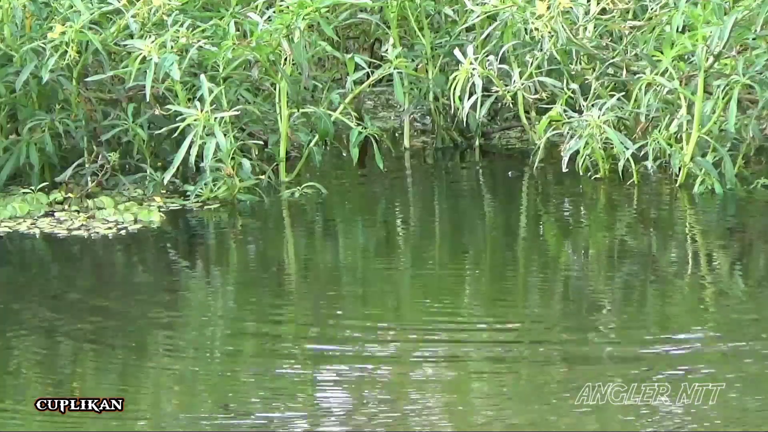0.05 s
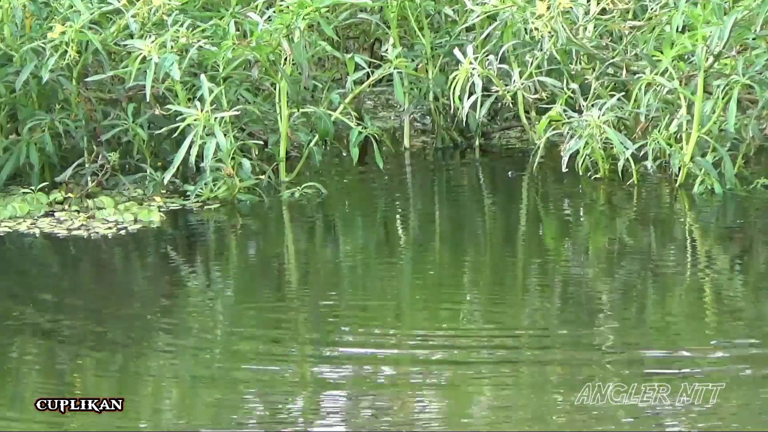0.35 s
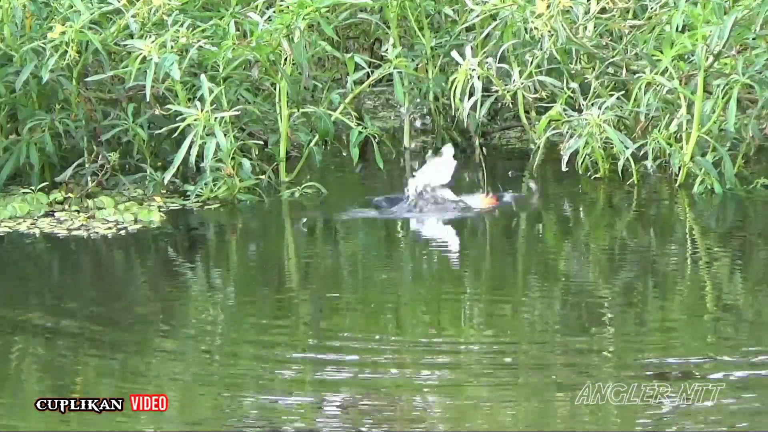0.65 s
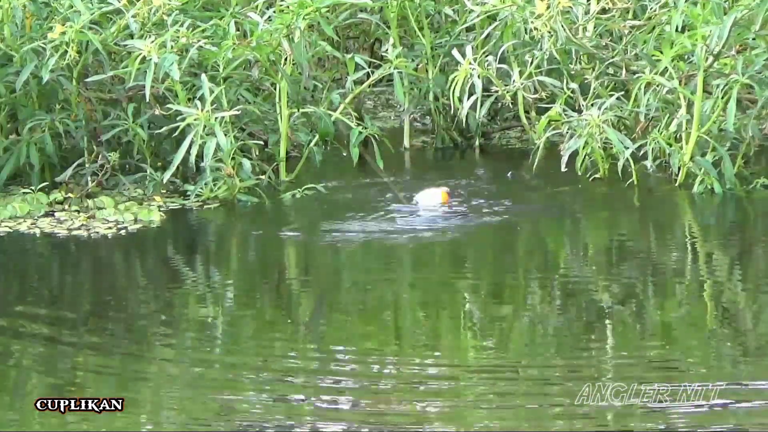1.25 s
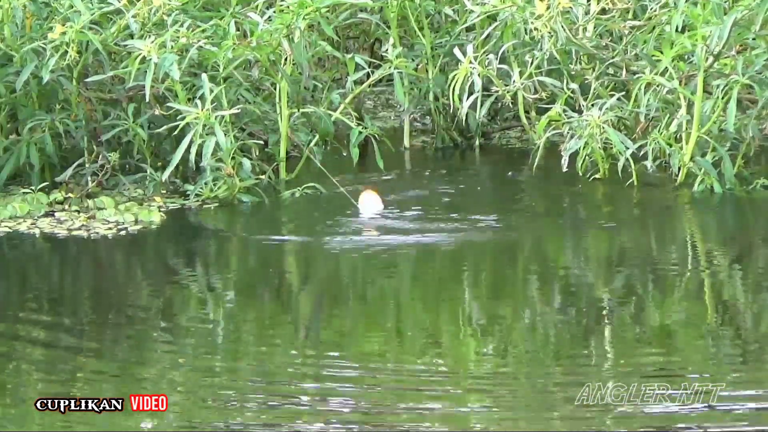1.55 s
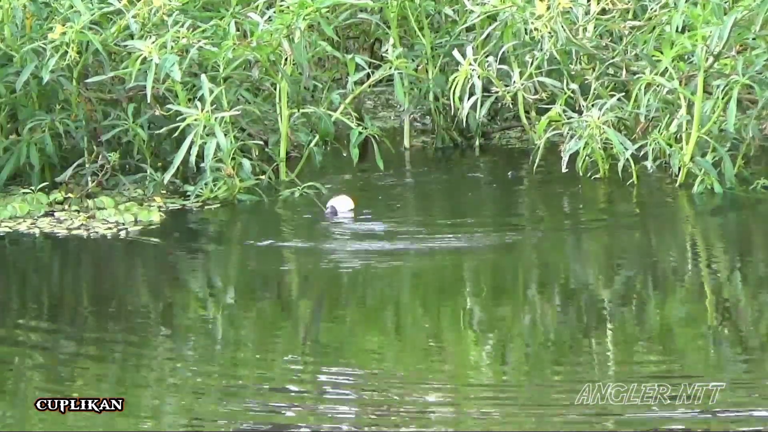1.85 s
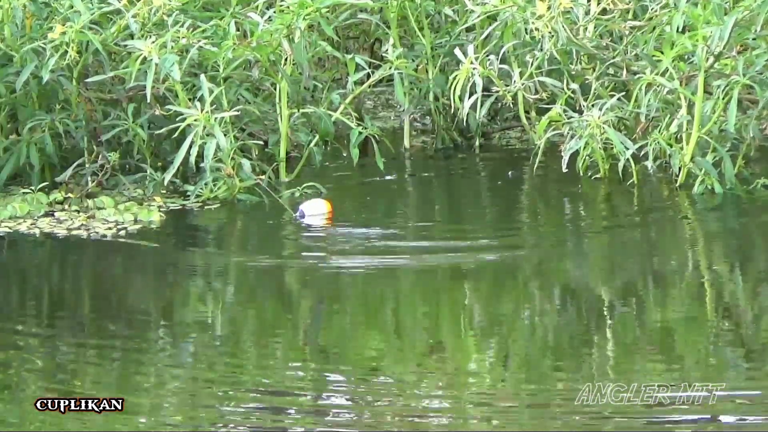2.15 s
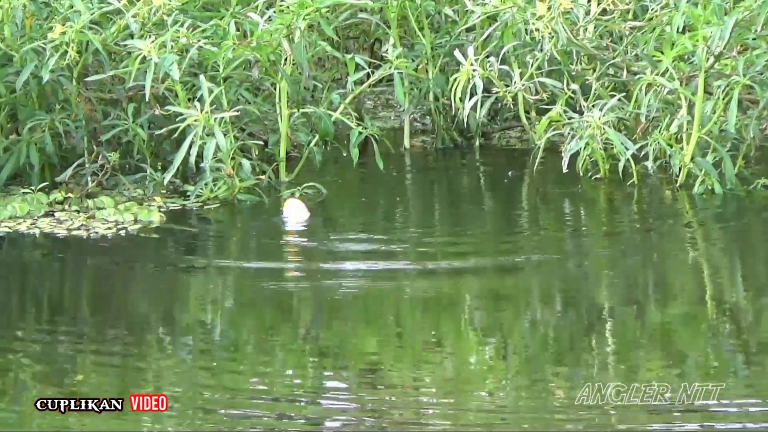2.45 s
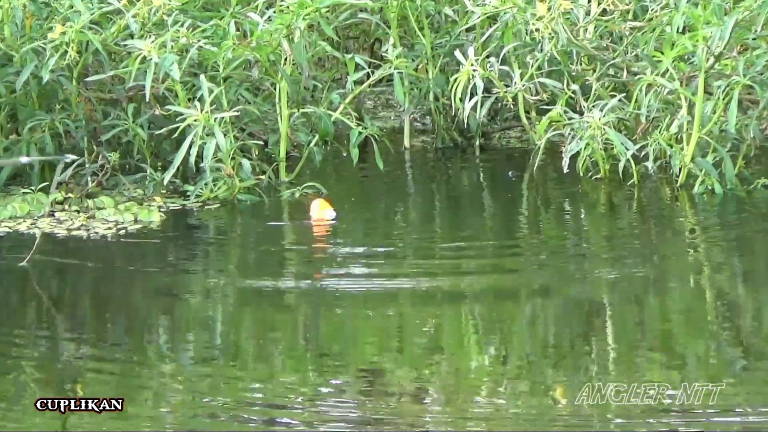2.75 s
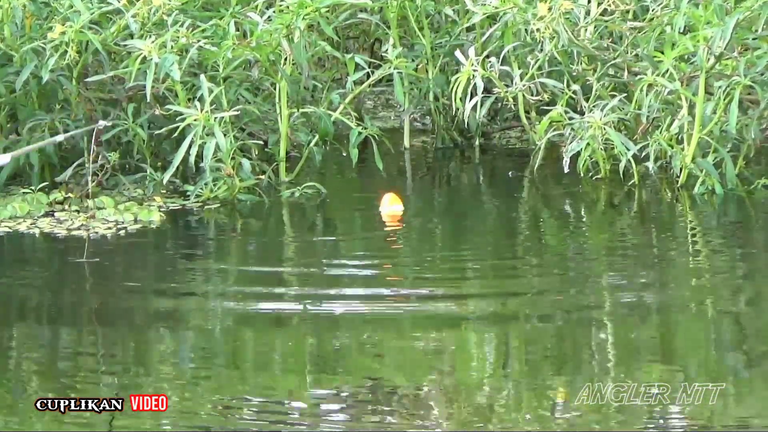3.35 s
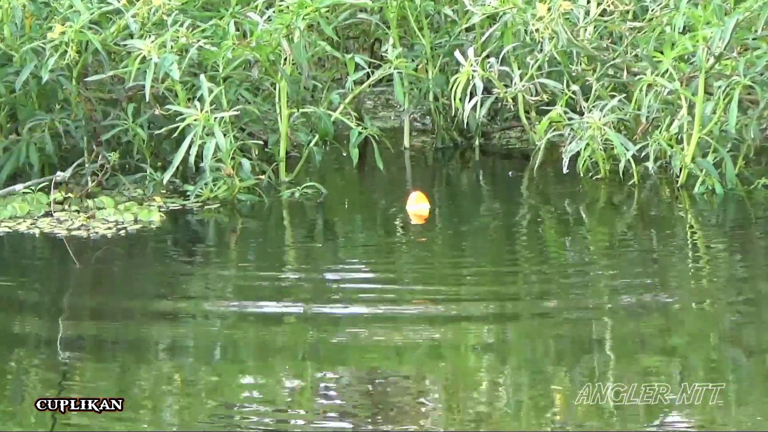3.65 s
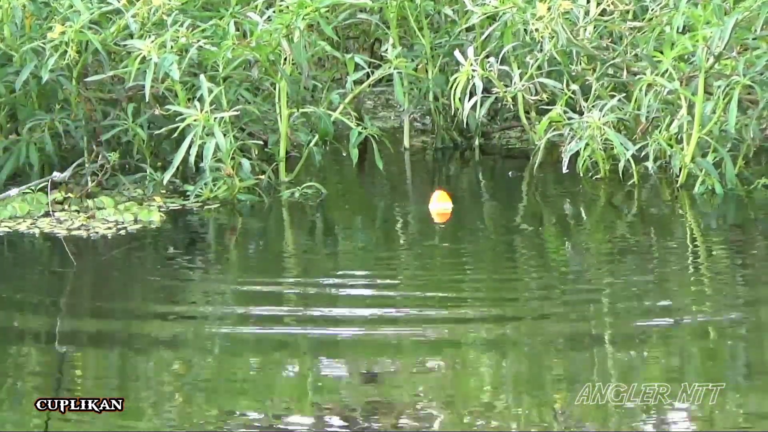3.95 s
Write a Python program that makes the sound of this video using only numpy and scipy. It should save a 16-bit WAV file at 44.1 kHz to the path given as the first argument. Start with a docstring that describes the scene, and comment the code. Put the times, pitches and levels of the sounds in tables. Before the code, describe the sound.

A fishing float slaps the water once, bubbling briefly and scattering droplets, followed by light clicks and scrapes of fishing line. Outdoors by a ditch, a close cricket pulses over a high insect chorus and soft low rumble.

```python
"""A fishing float slaps into a still ditch; its cavity closes in a quick run of ringing bubbles
and drops patter back. The tackle ticks and rustles faintly; water and plants scatter both sounds.
A near cricket trills by wing strokes over a far insect chorus, a low hum, rumble and outdoor air.
The sound fades in at the start."""
import sys
import numpy as np
from scipy import signal
from scipy.fft import rfft, irfft
from scipy.io import wavfile

SR = 44100
rng = np.random.default_rng(int(sys.argv[2]) if len(sys.argv) > 2 else 0)


def transcribe(u):
    """Save the signal u as a 16-bit wav file named by the first command-line argument.

    u: samples, shape (n,) or (channels, n), limited to [-1, 1]; the rate is SR.
    q: integer samples, one column per channel.
    """
    v = np.clip(np.atleast_2d(u).T, -1, 1)
    q = np.round(v * 32767).astype(np.int16)
    wavfile.write(sys.argv[1], SR, q)


N = 176400
T = np.arange(N) / SR

# diffuse field: f/Hz, left-right correlation
STEREO_CORRELATION = [(60, .99), (130, 1), (290, 0.81), (640, 0.2), (1400, 0.11), (3100, 0.33),
                      (6800, 0.57), (15000, 1)]
# air spectrum: f/Hz, relative level/dB
AIR_SPECTRUM = [(20, -16), (40, -7.5), (75, -4.5), (110, -1), (160, 0.5), (220, -8), (320, -7), (500, -9.5),
                (1000, -13.5), (2000, -18.5), (4000, -23), (7000, -26), (11000, -28), (15500, -39.5)]
# air envelope: t/s, level/dB
AIR_ENVELOPE = [(.25, -47), (1.2, -48), (1.85, -48), (2.3, -48), (3.2, -48.5), (4, -47.5)]
# rumble swells: t/s, half-width/s, level/dB
RUMBLE_SWELLS = [(1.42, .04, -53), (1.546, 0.029, -46), (1.766, 0.037, -46), (2.216, .12, -52),
                 (2.48, 0.053, -53.5), (3.72, 0.094, -51)]
# rumble resonances: f/Hz, bandwidth/Hz
RUMBLE_MODES = [(118, 20), (162, 29)]
# hum envelope: t/s, level/dB
HUM_ENVELOPE = [(.25, -42), (.5, -45.5), (.8, -43), (1.1, -50.5), (1.45, -46.5), (1.9, -48), (2.25, -45.5),
                (2.5, -49), (2.9, -44.5), (3.1, -50.5), (3.6, -45.5), (3.85, -55), (4, -52)]
# insect chorus spectrum: f/Hz, relative level/dB
CHORUS_SPECTRUM = [(7300, -20), (7800, -13.5), (8100, -8), (8450, -5), (9000, -3), (9550, -1.5),
                   (9950, -3.5), (10200, -7.5), (10600, -15), (11500, -23.5)]
# insect chorus envelope: t/s, relative level/dB
CHORUS_ENVELOPE = [(.25, -52), (1.2, -52.5), (2, -50.5), (2.7, -52), (3.4, -49), (4, -50)]
# far insects: f/Hz, bandwidth/Hz, pulse rate/Hz, pulse offset/s, end/s, depth, level/dB
FAR_SINGERS = [(10320, 260, 8.48, .259, 1.62, .8, -60), (2720, 300, 25, .0135, 3.2, 1, -66),
               (9950, 300, 11, .05, 2.3, .3, -61), (3200, 260, 25, .0135, 3.2, .7, -69),
               (5000, 350, 17.8, .03, 2.7, .6, -71)]
# cricket trills: start/s, end/s, chirp rate/Hz, relative level/dB
CRICKET_TRILLS = [(.1756, 1.08, 19.08, -1), (1.334, 2.89, 18.85, 0), (3.083, 3.84, 18.96, 1)]
# bank echo spectrum: f/Hz, relative level/dB
BANK_SPECTRUM = [(200, -18), (600, -6), (1300, 2), (3300, 5), (8000, 4), (15000, -3)]
# rustles (first row falling droplets, the rest line scraping): t/s, half-width/s, level/dB
RUSTLE_SWELLS = [(0.89, 0.016, -52), (1.825, .03, -63), (2.736, .04, -56), (2.812, .04, -56),
                 (2.87, 0.028, -53), (2.953, 0.03, -52.5), (3.04, 0.044, -50), (3.133, 0.011, -50),
                 (3.178, 0.029, -49), (3.222, 0.029, -56), (3.355, .035, -57), (3.41, 0.019, -54),
                 (3.446, 0.024, -49), (3.625, 0.037, -50.5)]
# rustle spectrum: f/Hz, relative level/dB
RUSTLE_SPECTRUM = [(800, -13), (3000, 0), (6000, -3), (9000, 6.5), (12500, -9), (15500, -11)]
# rustle resonances: f/Hz, relative level/dB
RUSTLE_MODES = [(10400, 1), (12200, 2), (13100, -9), (14800, -7)]
# rod and line ticks: t/s, peak/dB, f/Hz, bandwidth/Hz, t60/s
TACKLE_TICKS = [(1.5455, -38.5, 3440, 2000, 0.01), (1.589, -40, 2400, 3000, .008),
                (1.8125, -36, 3500, 5000, 0.009), (1.816, -31, 4200, 5000, 0.0095),
                (1.826, -37, 4000, 5000, 0.02), (1.852, -43, 4500, 5000, .008),
                (1.875, -39, 1990, 600, 0.025), (1.931, -39.5, 2500, 6000, .012),
                (2.338, -46, 2800, 3000, .008), (2.570, -43, 3000, 3000, 0.0055),
                (2.713, -38, 7000, 5000, .014), (2.779, -36, 5000, 8000, 0.0064),
                (2.8415, -25.5, 7940, 10000, .008), (2.8445, -29, 8500, 9000, 0.0074),
                (3.032, -37, 7000, 6000, 0.033), (3.1327, -36, 11000, 6000, .002),
                (3.1426, -19, 8700, 8000, 0.0032), (3.1443, -29, 8500, 8000, .004),
                (3.1473, -34, 8000, 8000, 0.0055), (3.1428, -45, 680, 250, .008),
                (3.2745, -33, 2900, 2000, .011), (3.4612, -27.5, 7800, 7000, 0.015)]
# handling crackle envelope: t/s, level/dB
CRACKLE_ENVELOPE = [(.2, -76), (.45, -65), (1.2, -65.5), (1.7, -73), (1.83, -52.5), (1.98, -63), (2.6, -62),
                    (2.85, -58.5), (3.3, -63), (4, -61)]
# handling crackle spectrum: f/Hz, relative level/dB
CRACKLE_SPECTRUM = [(300, -24), (900, -3.5), (2000, 2.5), (4000, -3), (7000, -5), (11000, -25),
                    (15000, -25)]
# droplet spray envelope: t/s, level/dB
SPRAY_ENVELOPE = [(.574, -85), (.581, -41), (.6, -44), (.614, -50), (.626, -40.5), (.645, -46), (.665, -32),
                  (.68, -62), (.72, -74), (.8, -85)]
# droplet spray spectrum: f/Hz, relative level/dB
SPRAY_SPECTRUM = [(400, -8), (1200, 5.5), (2200, 3), (3400, 0.5), (5000, 0), (8000, -1), (11000, -9),
                  (15000, -21)]
# trapped bubbles: t/s, f/Hz, peak/dB, t60/s, attack/s
BUBBLES = [(0.5814, 1300, -34, .006, .0001), (.5825, 3260, -33.5, 0.022, .0003),
           (.5887, 5660, -27, .006, .0002), (.6015, 1194, -42, 0.066, .0006),
           (.6215, 1020, -25, 0.032, .0001), (.6217, 510, -34.5, 0.058, 0.00089),
           (.6216, 790, -32, .005, 0.000064), (.6216, 3270, -26, 0.0053, 0.000085),
           (.6238, 4660, -28, 0.012, 0.00025), (.646, 1290, -15.5, 0.016, 0.00065),
           (.6461, 790, -30, 0.012, 0.00044), (.6563, 3360, -18.5, 0.0075, 0.00027),
           (.6564, 1440, -15.5, 0.0087, 0.000096), (0.6612, 1310, -32, 0.013, .0004),
           (.6615, 1530, -16.5, 0.0081, 0.00024), (.6619, 1195, -18.5, 0.019, .0003),
           (.6617, 804, -28.5, 0.016, 0.00022), (.6617, 2040, -29, 0.017, 0.00024),
           (.6622, 3640, -30.5, 0.023, 0.00033), (.6657, 5400, -30, .006, 0.00019),
           (.6722, 3350, -36, 0.018, .0003), (.681, 1280, -43, 0.023, .0006),
           (.685, 2870, -47, 0.015, .0004), (.697, 1230, -46, .03, .0006), (.709, 1590, -45, 0.022, .0006),
           (.8045, 3500, -41, 0.021, 0.00045), (.8195, 1900, -44.5, 0.026, 0.00076)]
# float and drop impacts: t/s, peak/dB, f/Hz, bandwidth/Hz, t60/s
WATER_SLAPS = [(.5812, -12, 8500, 10000, 0.0013), (.5814, -22, 9500, 10000, 0.0074),
               (.5835, -22, 8400, 11000, 0.041), (.5877, -19, 7600, 5000, 0.008),
               (.6178, -32, 6500, 4000, .004), (.6245, -26, 7000, 8000, 0.024),
               (.6385, -34, 7500, 4000, 0.014), (.6613, -31, 5000, 7000, 0.0079),
               (.6649, -23, 6800, 2500, 0.0037), (.8665, -32, 7500, 8000, 0.036),
               (.8735, -31, 6500, 5000, .016), (.8835, -35, 6000, 5000, .02),
               (.8875, -31, 12200, 3000, .008)]
# fade-in, last gain held: t/s, gain/dB
FADE_IN = [(.09, -62.5), (.12, -27), (.15, -15.5), (.2, -8), (.24, -3)]


def from_db(db):
    """Decibels to gain."""
    return 10 ** (np.asarray(db) / 20)


def unit_rms(x):
    """Scale to rms 1."""
    return x / np.sqrt(np.mean(np.abs(x) ** 2) + 1e-20)


def envelope(rows):
    """Gain over time from t/s, level/dB rows."""
    return from_db(np.interp(T, *np.transpose(rows)))


def swells(rows):
    """Gain over time as a sum of Gaussian bumps."""
    return sum(from_db(db) * np.exp(-2 * ((T - t_s) / half_s) ** 2) for t_s, half_s, db in rows)


def at_hz(rows, hz):
    """Interpolate on a log-frequency axis."""
    row_hz, values = np.transpose(rows)
    return np.interp(np.log(hz + 1), np.log(row_hz), values)


def colour(x, spectrum):
    """Apply a spectrum; rms 1."""
    size = x.shape[-1]
    gain = from_db(at_hz(spectrum, np.fft.rfftfreq(size, 1 / SR)))
    return unit_rms(irfft(rfft(x) * gain, size))


def drift(corner_hz):
    """Low-passed noise; rms 1."""
    rolloff = 1 + (np.fft.rfftfreq(N, 1 / SR) / corner_hz) ** 2
    return unit_rms(irfft(rfft(rng.standard_normal(N)) / rolloff, N))


def diffuse_noise():
    """White stereo noise from all around."""
    correlation = np.clip(at_hz(STEREO_CORRELATION, np.fft.rfftfreq(N, 1 / SR)), 0, .999)
    mid, side = rfft(rng.standard_normal((2, N)))
    return irfft(np.sqrt(1 + correlation) * mid + np.sqrt(1 - correlation) * side * [[1], [-1]], N)


def grains(rate_hz, spread_db):
    """Random clicks of uneven size."""
    hits = rng.random(N) < rate_hz / SR
    sizes = from_db(spread_db * np.minimum(rng.exponential(1, N), 3))
    return hits * sizes * rng.choice([-1, 1], N)


def resonate(x, hz, width_hz):
    """Two-pole resonator."""
    radius = np.exp(-np.pi * width_hz / SR)
    return signal.lfilter([1, 0, -1], [1, -2 * radius * np.cos(2 * np.pi * hz / SR), radius ** 2], x)


def narrow_band(x, hz, width_hz):
    """Two equal resonators in series; rms 1."""
    return unit_rms(resonate(resonate(x, hz, width_hz), hz, width_hz))


def add_event(out, t_s, peak_db, x):
    """Mix x in at a given time and peak."""
    start = int(t_s * SR)
    out[start:start + len(x)] += from_db(peak_db) * x[:N - start] / np.abs(x).max()


def impacts(rows, crackle_gain, size=3000):
    """Each contact: a click and dying crackle through a broad resonance."""
    out = np.zeros(N)
    for t_s, peak_db, hz, width_hz, t60_s in rows:
        force = crackle_gain * rng.standard_normal(size) * from_db(-60 * T[:size] / t60_s)
        force[0] = 1
        band = signal.iirpeak(min(hz, .4 * SR), hz / min(width_hz, SR / 4), fs=SR)
        add_event(out, t_s, peak_db, signal.lfilter(*band, resonate(force, hz, width_hz)))
    return out


def air():
    """Outdoor air: diffuse, bass-heavy noise."""
    return envelope(AIR_ENVELOPE) * colour(diffuse_noise(), AIR_SPECTRUM)


def rumble():
    """Soft swells of noise in two low resonances."""
    modes = sum(narrow_band(rng.standard_normal(N), hz, width_hz) for hz, width_hz in RUMBLE_MODES)
    return swells(RUMBLE_SWELLS) * unit_rms(modes)


def hum(hz=56.4, waver_hz=.71, octave_db=-15.5, waver_db=1.5):
    """Wavering low tone and its octave, like a distant motor."""
    phase = 2 * np.pi * np.cumsum(hz + waver_hz * drift(4.5)) / SR
    tone = np.sin(phase) + from_db(octave_db) * drift(2.7) * np.sin(2 * phase)
    return envelope(HUM_ENVELOPE) * from_db(waver_db * drift(11)) * unit_rms(tone)


def far_insects(chorus_gain_db=3, flutter_db=.93, release_s=.05):
    """Steady high buzz plus a few pulsing narrow-band singers."""
    chorus_gain = envelope(CHORUS_ENVELOPE) * from_db(chorus_gain_db + flutter_db * drift(70))
    out = chorus_gain * colour(diffuse_noise(), CHORUS_SPECTRUM)
    for hz, width_hz, rate_hz, offset_s, end_s, depth, db in FAR_SINGERS:
        pulse = 1 + depth * np.cos(2 * np.pi * rate_hz * (T - offset_s))
        gate = np.clip((end_s - T) / release_s, 0, 1)
        out += from_db(db) * pulse * gate * narrow_band(diffuse_noise(), hz, width_hz)
    return out


def cricket(hz=8183, sag_hz=120, sigma_s=.009, roughness=.4, rough_hz=110, base_db=-48.5, scatter_db=-12):
    """Each wing stroke: a short rough whistle, sagging at its end. Plants scatter a little."""
    out = np.zeros((2, N))
    for start_s, end_s, rate_hz, db in CRICKET_TRILLS:
        from_peak_s = (((T - start_s) * rate_hz + .5) % 1 - .5) / rate_hz
        stroke = np.exp(-.5 * (from_peak_s / sigma_s) ** 2)
        gate = (T > start_s - .5 / rate_hz) * (T < end_s + .4 / rate_hz)
        pitch_hz = hz - sag_hz * np.maximum(2 * from_peak_s * rate_hz, 0) ** 2
        rasp = unit_rms(1 + roughness * (drift(rough_hz) + 1j * drift(rough_hz)))
        phase = 2 * np.pi * np.cumsum(pitch_hz) / SR + 2 * drift(6.6)
        whistle = np.sqrt(2) * np.real(rasp * np.exp(1j * phase))
        scatter = resonate(diffuse_noise(), hz - sag_hz / 2, width_hz=300)
        scatter = from_db(scatter_db) * unit_rms(resonate(scatter, hz, width_hz=300))
        out += from_db(base_db + db) * gate * (stroke * whistle + scatter)
    return out


def bank_echo(x, early_db=-15.5, early_t60_s=.022, tail_db=-20, tail_t60_s=.25, size=16000):
    """Water and plants scatter x: direct sound, quick side reflections, faint tail."""
    t = T[:size]
    noise = colour(rng.standard_normal((3, size)), BANK_SPECTRUM)
    early = from_db(early_db) * unit_rms(noise[0] * from_db(-60 * t / early_t60_s)) * [[1], [-1]]
    tail = from_db(tail_db) * unit_rms(noise[1:] * from_db(-60 * t / tail_t60_s))
    return x + signal.fftconvolve(x[None], (early + tail) / np.sqrt(size), axes=1)[:, :N]


def rustles(jerk_db=2, ring_width_hz=670, ring_db=-2):
    """Jerky swells of fine clicks: droplets patter just after the splash, later the line scrapes."""
    clicks = grains(rate_hz=3200, spread_db=4.5) * from_db(jerk_db * drift(60))
    rings = unit_rms(sum(from_db(db) * resonate(clicks, hz, ring_width_hz) for hz, db in RUSTLE_MODES))
    return swells(RUSTLE_SWELLS) * (colour(clicks, RUSTLE_SPECTRUM) + from_db(ring_db) * rings)


def tackle():
    """Rod and line tick; handling crackles softly."""
    crackle = envelope(CRACKLE_ENVELOPE) * colour(grains(rate_hz=250, spread_db=2), CRACKLE_SPECTRUM)
    return impacts(TACKLE_TICKS, crackle_gain=.55) + crackle


def spray():
    """Tiny droplets land as dense clicks."""
    droplets = colour(grains(rate_hz=3000, spread_db=5.5), SPRAY_SPECTRUM)
    end_s = SPRAY_ENVELOPE[-1][0]
    return envelope(SPRAY_ENVELOPE) * (T < end_s) * droplets


def bubbles(rise_per_s=1.3, size=4000):
    """Trapped bubbles swell, ring and die, rising in pitch; pressure is the derivative of flow."""
    out, t = np.zeros(N), T[:size]
    for t_s, hz, peak_db, t60_s, attack_s in BUBBLES:
        amplitude = (1 - np.exp(-t / attack_s)) ** 2 * from_db(-60 * t / t60_s)
        flow = amplitude * np.cos(2 * np.pi * hz * t * (1 + rise_per_s * t / 2))
        add_event(out, t_s, peak_db, np.gradient(flow))
    return out


def float_splash():
    """Float and drops slap the water, throwing spray and trapping bubbles."""
    return spray() + impacts(WATER_SLAPS, crackle_gain=.44) + bubbles()


def scene():
    """Splash, rustles and tackle with bank echo, over insects and low background."""
    foreground = bank_echo(float_splash() + rustles() + tackle())
    return foreground + cricket() + far_insects() + hum() + rumble() + air()


def record(dry):
    """Fade-in and steep low-pass."""
    cutoff_hz = 15600
    lowpass = signal.butter(24, cutoff_hz, fs=SR, output="sos")
    return signal.sosfiltfilt(lowpass, dry * envelope(FADE_IN))


dry = scene()
out = record(dry)
transcribe(out)
```